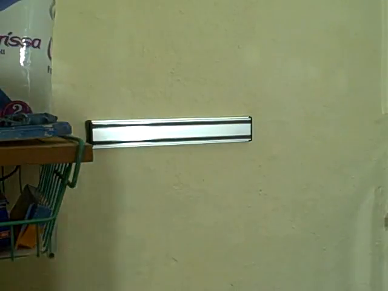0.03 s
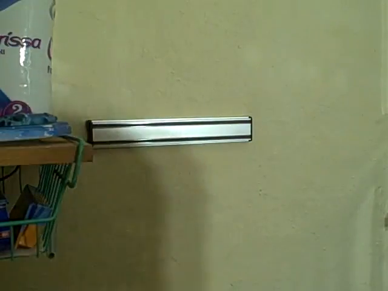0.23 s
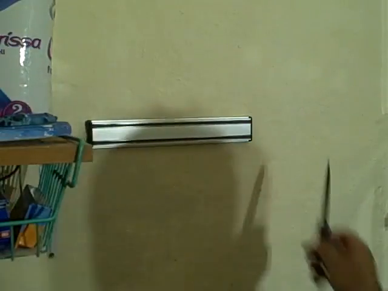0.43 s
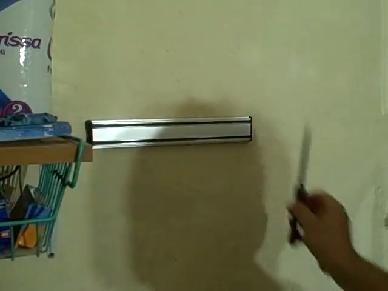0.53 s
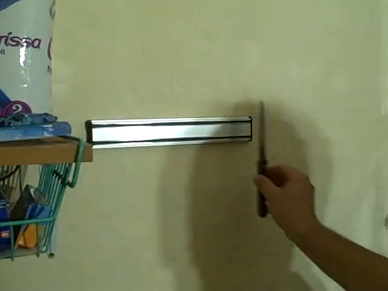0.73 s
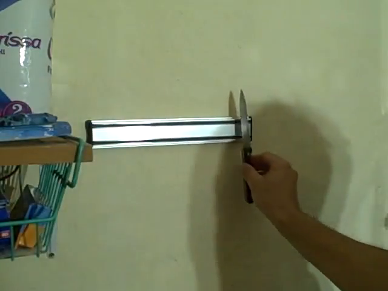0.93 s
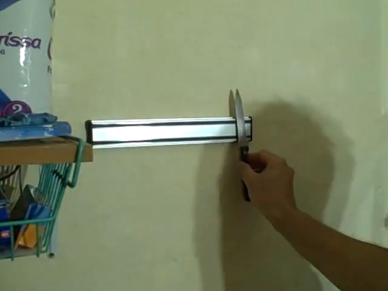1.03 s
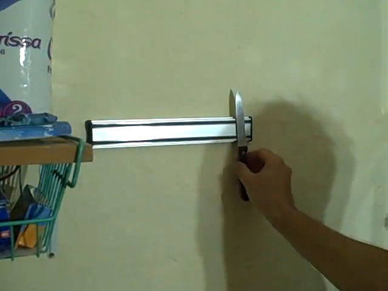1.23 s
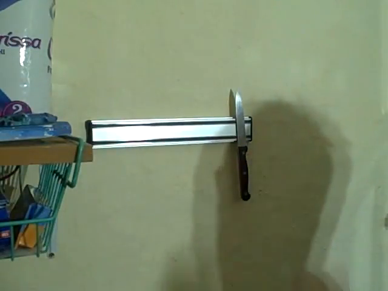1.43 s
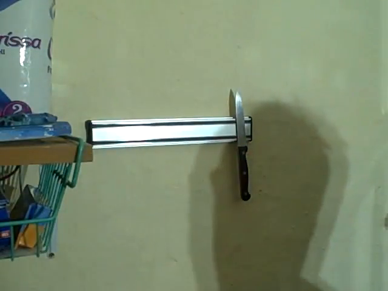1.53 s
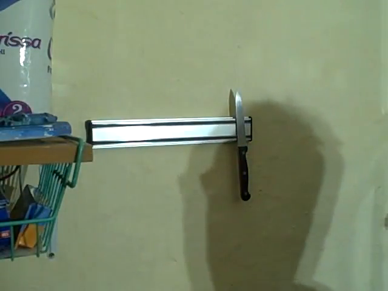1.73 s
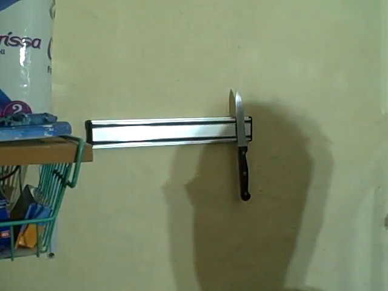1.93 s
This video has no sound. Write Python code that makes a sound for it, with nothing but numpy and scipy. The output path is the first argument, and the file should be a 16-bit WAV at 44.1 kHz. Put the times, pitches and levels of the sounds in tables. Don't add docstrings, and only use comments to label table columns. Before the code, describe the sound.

A steel kitchen knife snaps onto a wall magnet strip with one sharp metallic double clack.

```python
import sys
import numpy as np
from scipy import signal
from scipy.fft import rfft, irfft
from scipy.io import wavfile
from scipy.ndimage import uniform_filter1d

SR = 44100
rng = np.random.default_rng(int(sys.argv[2]) if len(sys.argv) > 2 else 0)


def master(y):
    cut = np.clip(np.atleast_2d(y).T, -1, 1)
    pcm = np.round(cut * 32767)
    wavfile.write(sys.argv[1], SR, pcm.astype(np.int16))


def linear_from_db(decibels):
    return 10 ** (np.asarray(decibels, float) / 20)


N = 88200


def unit(x):
    return x / np.sqrt(np.mean(x ** 2))


def along(table, hz):
    table = np.array(table)
    return np.interp(np.log(np.maximum(hz, 1)), np.log(table[:, 0]), table[:, 1])


def colour(x, table):
    gain = linear_from_db(along(table, np.fft.rfftfreq(len(x), 1 / SR)))
    return irfft(rfft(x) * gain, len(x))


def band(x, hz, width):
    return signal.lfilter(*signal.iirpeak(hz, hz / width, fs=SR), x)


def walk(rate):
    k = int(SR / rate)
    steps = np.repeat(rng.standard_normal(N // k + 1), k)
    return unit(uniform_filter1d(uniform_filter1d(steps, k), k)[:N])


def fade(t, t60):
    return (t >= 0) * np.exp(-np.log(1000) * np.maximum(t, 0) / t60)


def fridge(t):
    # f/Hz, rms level/dB
    hum_lines = [(123.3, -62.5), (246.5, -76.5), (287.6, -65.5), (328.4, -47), (428.3, -57.5), (492.8, -56),
                 (657.5, -60), (821.7, -62), (1227, -62)]
    # t/s, hum gain/dB
    load = [(0, .5), (.25, 2), (.55, -2.1), (.85, 0), (1.1, 0), (1.5, -.5), (1.75, -0.5), (2, .5)]
    # f/Hz, density/dB
    air_colour = [(40, -20), (72, -20.5), (125, -14), (330, -14.5), (1200, -19.5), (2500, -29),
                  (6000, -42.5), (15000, -50.5)]
    pulse_hz, pulse_depth = 85.2, 0.1
    turn = np.cumsum(1 + 0.0018 * walk(2.99)) / SR
    hum = 0
    for hz, db in hum_lines:
        wobble = linear_from_db(db + 2.0 + 0.7 * walk(11))
        hum = hum + wobble * np.sin(2 * np.pi * (hz * turn + rng.random()))
    hum = hum * linear_from_db(np.interp(t, *np.array(load).T))

    air = unit(colour(rng.standard_normal(N), air_colour))
    throb = np.cos(2 * np.pi * pulse_hz * turn) + 0.38 * np.cos(2 * 2 * np.pi * pulse_hz * turn)
    mids = band(air, 1100, 3000)
    flicker = linear_from_db(-48 + 0.57 * walk(8.78))
    return hum + flicker * (air + pulse_depth * throb * mids)


def whine(t):
    return linear_from_db(-75) * np.sin(2 * np.pi * 15625 * t)


def sleeve(t):
    # peak t/s, rise/s, fall/s, level/dB, treble tilt/dB per octave
    rubs = [
        (.02, .05, 0.08, -66.5, 1),
        (.27, 0.078, 0.065, -61, 2.5),
        (.45, 0.083, 0.055, -64, -1),
        (.58, 0.077, 0.17, -62.5, -2),
        (.71, 0.029, 0.074, -54.5, -3.7),
        (.775, .04, 0.083, -53, -4),
        (1.19, 0.033, 0.036, -66.5, 2),
        (1.91, 0.034, 0.019, -63.5, 3.5),
        (1.99, 0.0085, .05, -70, 0),
    ]
    # f/Hz, density/dB
    cloth_colour = [(1200, -22), (2200, -6.5), (4000, 1.8), (6000, -1.5), (10000, -2), (15800, -6)]
    out = 0
    for s, rise, fall, db, tilt_db in rubs:
        grains = rng.standard_normal(N) * linear_from_db(0.6 * walk(29.3))
        tilted = [(hz, v + tilt_db * np.log2(hz / 4000)) for hz, v in cloth_colour]
        cloth = unit(colour(grains, [(400, -54)] + tilted))
        swell = np.exp(-.5 * ((t - s) / np.where(t < s, rise, fall)) ** 2)
        out = out + cloth * linear_from_db(db + 1.5) * swell
    return out


def knocks(t):
    # t/s, level/dB, f/Hz, width/Hz, t60/s
    taps = [
        (.285, -52, 3020, 2500, 0.053),
        (0.435, -46, 1460, 720, 0.047),
        (.434, -58.5, 5360, 1200, .07),
        (0.449, -47, 1380, 800, .06),
        (.458, -56, 1310, 700, 0.11),
        (0.623, -55, 1290, 700, .06),
        (1.9952, -44, 3830, 1500, 0.073),
        (1.996, -59, 8570, 2500, 0.073),
    ]
    rise_s = 0.0011
    out = 0
    for s, db, hz, width, t60 in taps:
        burst = rng.standard_normal(N) * fade(t - s, t60) * np.clip((t - s) / rise_s, 0, 1)
        out = out + linear_from_db(db) * np.sqrt(SR / width) * band(band(burst, hz, width), hz, width)
    return out


def room(x):
    # f/Hz, t60/s
    room_t60 = [(700, 0.64), (1500, 0.27), (3000, 0.47), (6000, 0.3155), (10000, 0.3861), (15000, 0.23)]
    # f/Hz, level/dB
    room_colour = [(700, 7), (1500, -1), (3000, 1.5), (6000, 4), (10000, -2.5), (15000, 3.5)]
    level_db, rise_s = -6, 0.0042
    t, tail = np.arange(SR // 2) / SR, 0
    for hz in 500 * 2 ** np.arange(0, 5.1, .5):
        noise = band(band(rng.standard_normal(len(t)), hz, hz / 2), hz, hz / 2)
        tail = tail + linear_from_db(along(room_colour, hz)) * noise * fade(t, along(room_t60, hz))
    tail = tail * (1 - np.exp(-(t / rise_s) ** 2))
    tail = tail / np.sqrt(np.sum(tail ** 2))
    return linear_from_db(level_db) * signal.fftconvolve(x, tail)[:N]


def scrape(t, t60):
    # f/Hz, density/dB
    crack = [(200, -45), (600, -9.5), (1500, -7), (3700, -13), (5500, -10.5), (10000, -7), (16000, -13.5)]
    lead = 64
    burst = rng.standard_normal(len(t)) * fade(t - lead / SR, t60)
    return np.roll(colour(burst, crack), -lead)


def ring_modes(t, mode_hz, damping, rebound):
    hz = np.array(mode_hz)[:, None]
    width, mode_db = np.array(damping).T[:, :, None]
    share = linear_from_db(mode_db + 2 * rng.standard_normal(hz.shape)) * width
    if rebound:
        share = share * rng.choice([-1, 1], hz.shape) / (1 + (2500 / hz) ** 2)
    rise_s = 1 / hz + 0.004 * (1000 / hz) ** 2
    swell = 1 - np.exp(-t / rise_s)
    modes = share * np.sin(2 * np.pi * hz * t) * np.exp(-np.pi * width * t) * swell
    return modes.sum(axis=0) / np.sqrt(np.sum(share ** 2))


def knife():
    contact_s = [1.2479, 1.2503, 1.2515, 1.2521, 1.2554, 1.2727, 1.2732, 1.2742, 1.2780, 1.2805, 1.2882,
                 1.30345, 1.3056, 1.3076, 1.3118, 1.3225]
    # level/dB, scrape level/dB, scrape t60/s, grip (0 edge, 1 rocking, 2 flat)
    contacts = [(-11, -3, 0.017, 0), (-33, -12, 0.013, 0), (-18, -15, 0.0039, 0), (-17, -17, 0.01, 0),
                (-23.5, 1, 0.037, 0), (-15, -5, .02, 1), (-16.5, 3, 0.0064, 1), (-23.5, -5, 0.026, 1),
                (-21.5, 3, 0.022, 1), (-41, -13, 0.044, 1), (-20, -16, 0.014, 1), (-4.5, -16.5, 0.0097, 2),
                (-7, -17, .02, 2), (-17, -2, 0.008, 2), (-26, 7, 0.0093, 2), (-29, -16, .03, 2)]
    edge_hz = [836, 1477, 2190, 2410, 3370, 4350, 5150, 7150, 8850, 9800, 11030, 12040, 13300, 14550]
    # width/Hz, level/dB
    edge = [(55, 6), (80, 1), (80, 2), (130, -7.5), (200, -2), (180, -5.5), (249, -6.5), (300, -6),
            (302, -3.5), (250, -17), (277.78, -15), (250, -8), (300, -20), (250, -9)]
    rock_hz = [1620, 2208, 2720, 4430, 5300, 6750, 7600, 8400, 10300, 11800, 13800, 14600]
    # width/Hz, level/dB
    rock = [(220, 6), (130, 4), (200, -0.5), (300, -10), (400, -4.5), (400, 4.5), (300, -5), (300, 0),
            (400, -21), (500, -6.5), (400, -19), (300, -12)]
    flat_hz = [1617, 2180, 3050, 5050, 5280, 5950, 6230, 6700, 7500, 9470, 10200, 11400, 14230, 14520]
    # width/Hz, level/dB
    flat = [(55.4, 5), (98, -2), (170, -12.5), (180, -7.5), (198, -9), (220, -10), (260, 0), (250, -13.5),
            (400, -6.5), (220, -4), (350, -12), (400, -11), (300, -8.5), (220, -11.5)]
    grips = [(edge_hz, edge), (rock_hz, rock), (flat_hz, flat)]
    out, t, last = np.zeros(N), np.arange(4096) / SR, -1
    for s, (db, scrape_db, t60, grip) in zip(contact_s, contacts):
        grip = int(round(grip))
        mode_hz, damping = grips[grip]
        ringing = ring_modes(t, mode_hz, damping, rebound=grip == last)
        hit = ringing + linear_from_db(scrape_db + 5.5) * scrape(t, t60)
        i, last = int(s * SR), grip
        out[i:i + len(t)] += linear_from_db(db) * hit
    return signal.sosfilt(signal.butter(2, 500, "high", fs=SR, output="sos"), out)


def scene():
    t, blade = np.arange(N) / SR, knife()
    return (fridge(t) + whine(t) + sleeve(t) + knocks(t) + room(blade) + blade)[None]


def roll_off(x):
    return signal.sosfilt(signal.butter(12, 16960, fs=SR, output="sos"), x)


def record(dry):
    top_hz, spill_hz = 15800, 16600
    x = dry[0] + linear_from_db(-73) * rng.standard_normal(N)
    low = colour(x, [(top_hz - 60, 0), (top_hz + 40, -80)])
    spill = 32 * uniform_filter1d(low ** 2, size=64) * (x - low)
    spill = colour(spill, [(spill_hz, 0), (spill_hz + 300, -30)])
    return roll_off((low + spill)[None])


dry = scene()
out = record(dry)
master(out)
```